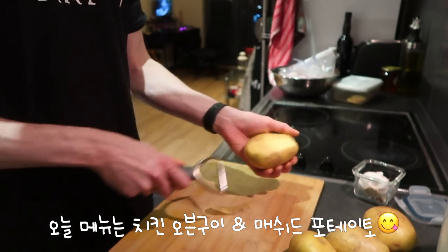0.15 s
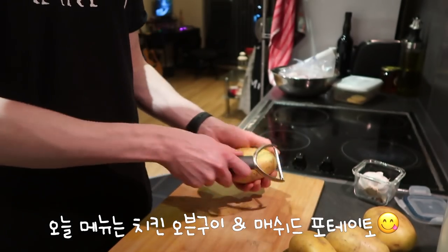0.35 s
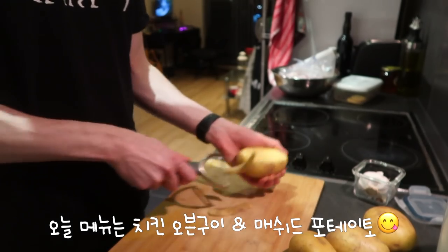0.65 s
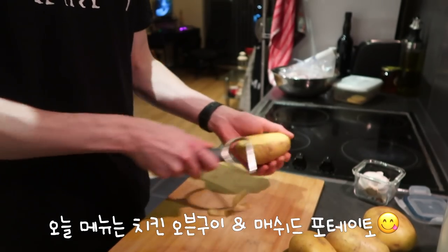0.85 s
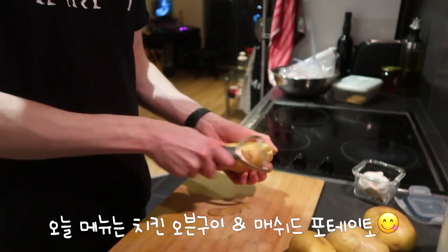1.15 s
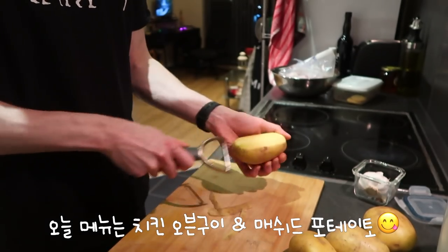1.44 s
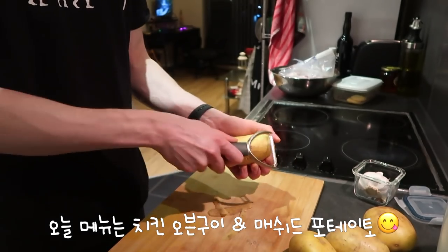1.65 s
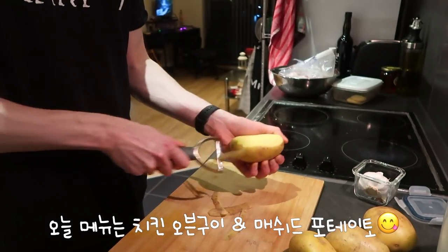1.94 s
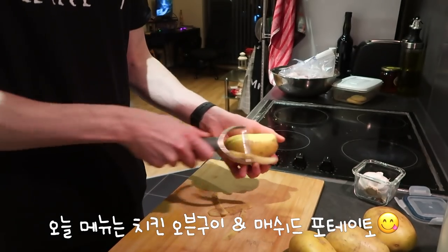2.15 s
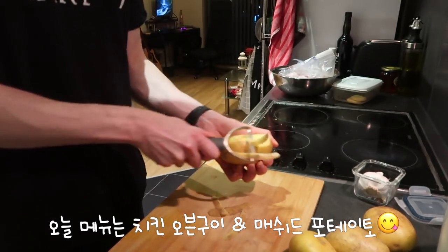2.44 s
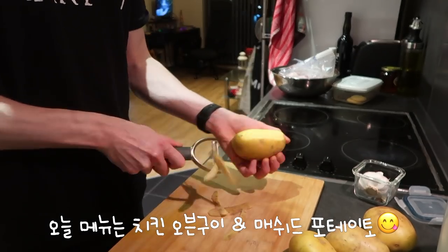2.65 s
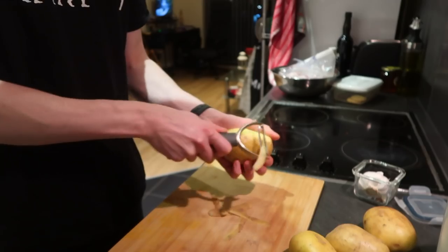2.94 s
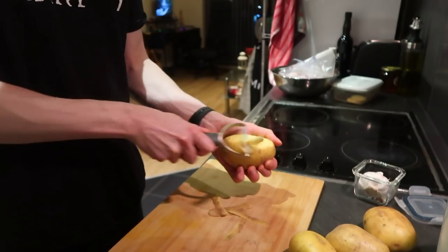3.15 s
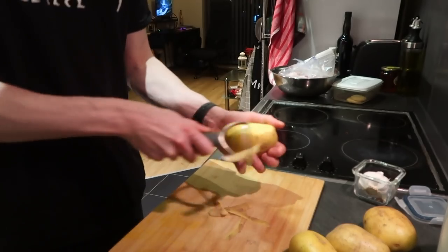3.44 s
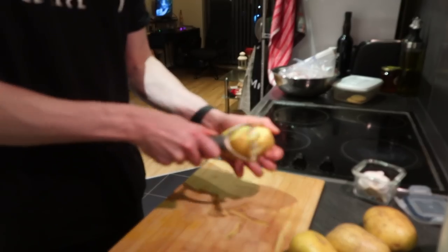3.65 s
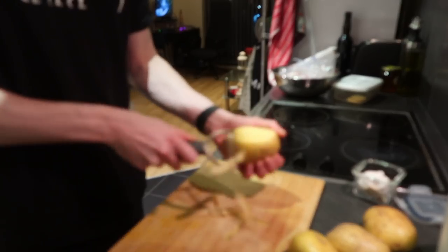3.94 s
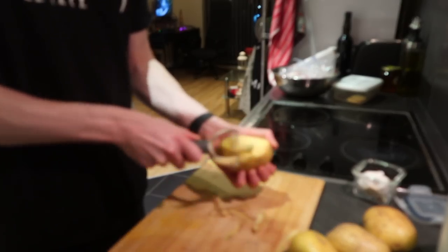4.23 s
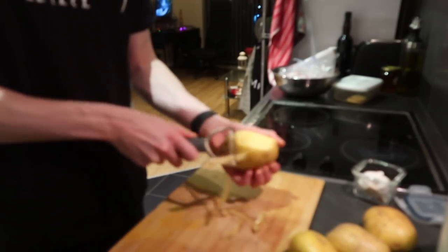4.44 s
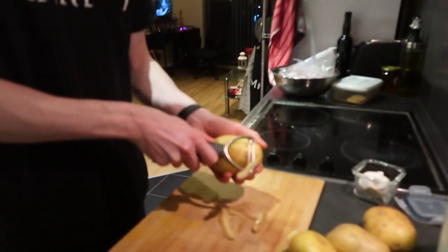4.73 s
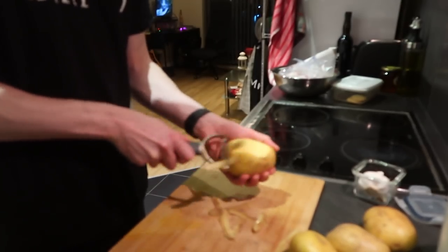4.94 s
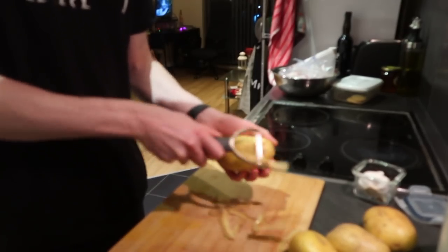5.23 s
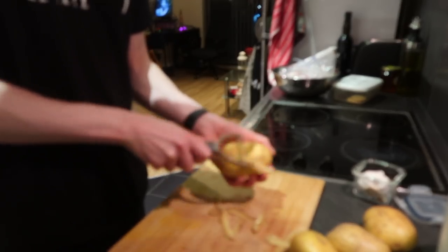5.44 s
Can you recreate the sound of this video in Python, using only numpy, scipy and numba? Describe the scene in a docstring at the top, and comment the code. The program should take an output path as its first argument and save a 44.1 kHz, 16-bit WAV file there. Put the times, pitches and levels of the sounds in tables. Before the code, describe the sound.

Ten short peeling strokes on a firm potato, heard from very near, with light rattles of the thin metal blade between them. The rasps are dry and crisp, rising in brightness toward their ends. Behind them an extractor rumbles steadily, and four muffled, ringing knocks sound elsewhere at uneven intervals. The room echo is short, and the recording level dips slightly after loud hits.

```python
"""A swivel peeler is drawn over a potato in ten quick strokes at a kitchen counter, above an extractor's rumble.
From the first stroke on, struck blade modes click and random tearing clicks rasp through sliding blade bands;
wavering noise bands squeak now and then. Four dull knocks of coloured, ringing noise sound from further off
and die away among the strokes. Two close microphone ports hear it all; a gain control turns loud moments down.
"""
import sys
import numpy as np
from scipy import signal
from scipy.fft import rfft, irfft
from scipy.io import wavfile
from scipy.ndimage import uniform_filter1d
from numba import njit

SR = 44100
rng = np.random.default_rng(int(sys.argv[2]) if len(sys.argv) > 2 else 0)


def digitize_waveform(pressure):
    """Quantize a signal to 16-bit integers and store it at the path in sys.argv[1].

    Rows of a 2-D input are taken as channels; values are limited to [-1, 1].
    """
    field = np.atleast_2d(pressure).T
    bounded = np.clip(field, -1, 1)
    quanta = np.round(bounded * 32767).astype(np.int16)
    wavfile.write(sys.argv[1], SR, quanta)


N = 246116
HZ = np.fft.rfftfreq(N, 1 / SR) + 1e-3
TIME = np.arange(N) / SR

# peeling strokes: start_s, first_glide_s, second_glide_s, start_db, second_db, end_db, treble_share_db, flesh_share_db,
# low_band_start_hz, low_band_end_hz, high_band_start_hz, high_band_end_hz, high_band_share_db
PEEL_STROKES = [(0.0, 0.0063, 0.0082, -33, -41, -32, -9.5, -11.5, 2600, 2800, 4060, 4320, -1),
                (0.509, 0.019, 0.16, -48, -39, -35.5, -14, -11, 2680, 2360, 4960, 5480, -7),
                (1.165, 0.14, 0.088, -46.5, -39.5, -46, -12, -15, 2650, 2290, 4440, 5500, -3),
                (1.776, 0.033, 0.19, -53, -38.5, -40, -14, -15.5, 2600, 2460, 4400, 5070, -11),
                (2.368, 0.0084, 0.25, -31.5, -52, -39, -12, -1, 2500, 2070, 4380, 5040, -20),
                (3.117, 0.025, 0.16, -68, -44.5, -39.5, -10, -5, 2670, 2250, 3950, 5300, -9.5),
                (3.689, 0.049, 0.088, -42, -37, -39.5, -12, -11.5, 2550, 2540, 4050, 4660, -1.5),
                (4.172, 0.049, 0.15, -52, -37, -41, -11.5, -14.5, 2700, 2320, 4470, 5330, -11),
                (4.872, 0.013, 0.13, -51, -40.5, -35, -13, -20.5, 2630, 2480, 4730, 5700, -10),
                (5.411, 0.015, 0.14, -60, -41.5, -34, -16, -26, 2880, 2480, 4830, 4700, -12)]
# blade landing and rattling on its pivots: start_s, level_db, brightness_db, skid_db, strongest_ring_hz, second_ring_hz
BLADE_CONTACTS = [(0.0044, -24, -8, -45, 2720, 2720), (0.084, -22, -1, -43, 3500, 2480),
                  (0.147, -27.5, -3, -50.5, 2470, 1450), (0.475, -4, -2, -35.5, 3030, 3050),
                  (0.4874, -21, 12, -52, 2920, 4750), (0.716, -17.5, -4.5, -46.5, 3260, 3260),
                  (0.801, -29, 0, -43.5, 3040, 2930), (1.0605, -22.5, -7, -59, 3300, 1700),
                  (1.0915, -17, -2, -41, 2860, 4330), (1.099, -22, -6, -51, 2350, 4640),
                  (1.108, -34, 0, -63, 1900, 4200), (1.304, -30.5, -15, -50, 2180, 2180),
                  (1.339, -32, -4, -43.5, 2320, 2310), (1.3985, -21.5, -3, -49, 2960, 2960),
                  (1.456, -26.5, -1, -49, 2290, 2290), (1.522, -32, -11, -60, 2430, 2430),
                  (1.737, -12, -0.5, -40, 3210, 2480), (1.745, -21.5, 5, -47.5, 3050, 2080),
                  (2.042, -26, -6, -46, 2920, 4750), (2.754, -41, 2, -46.5, 1910, 1900),
                  (2.79, -28, 4, -52, 2320, 2340), (2.8888, -22.5, -3, -45.5, 1900, 3640),
                  (2.897, -28, -7.5, -48.5, 1140, 1950), (3.071, -36, -17, -40, 3070, 3100),
                  (3.084, -11.5, -2.5, -43, 3520, 3500), (3.0903, -20.5, -7, -39, 3480, 4200),
                  (3.1, -22, -2, -41.5, 2900, 4200), (3.6228, -29, -3, -50, 3480, 3460),
                  (3.6336, -17.5, -0.5, -40, 2080, 2080), (3.6596, -15, -5, -38.5, 3000, 2500),
                  (4.096, -28.5, -13, -57, 2300, 2270), (4.1689, -9.5, 3, -40.5, 2080, 3920),
                  (4.179, -29, 6, -41.5, 4750, 5250), (4.803, -2, 0, -37, 2130, 3300),
                  (4.814, -16, 3, -42, 2100, 5250), (5.009, -34, -4, -44, 2350, 2350),
                  (5.02, -27, -2, -45, 2350, 2900), (5.074, -24.5, 2.5, -48, 2920, 3540),
                  (5.196, -37, 5, -61, 2340, 2340), (5.312, -50, 3, -49, 1990, 1990),
                  (5.358, -12, -2, -38, 2070, 2950), (5.368, -28, 5, -48, 4800, 2080)]


def amp(db):
    """dB to gain."""
    return 10 ** (np.asarray(db) / 20)


def rms_one(x):
    """Scale to unit power."""
    return x / np.sqrt(np.mean(x ** 2) + 1e-20)


def colour(x, points):
    """Shape by a spectrum drawn on log frequency, falling 30 dB per octave outside it."""
    hz, db = np.transpose(points)
    octaves = np.log2(HZ)
    below = np.maximum(np.log2(hz[0]) - octaves, 0)
    above = np.maximum(octaves - np.log2(hz[-1]), 0)
    gain_db = np.interp(octaves, np.log2(hz), db) - 30 * (below + above)
    return irfft(rfft(x) * amp(gain_db), N)


def butter_part(x, order, hz, kind):
    """Part of x below ("low") or above ("high") a corner."""
    return signal.sosfilt(signal.butter(order, hz, kind, fs=SR, output="sos"), x)


def resonate(x, hz, width_hz):
    """Two-pole resonance, gain 1 on top."""
    r = np.exp(-np.pi * width_hz / SR)
    poles = [1, -2 * r * np.cos(2 * np.pi * hz / SR), r * r]
    return signal.lfilter(np.array([1, 0, -1]) * (1 - r * r) / 2, poles, x)


def resonate_twice(x, hz, width_hz):
    """Two equal resonances in series: steeper skirts."""
    return resonate(resonate(x, hz, width_hz), hz, width_hz)


@njit
def glide(x, turn, r):
    """Two-pole resonance whose centre moves; turn is the cosine of its phase step."""
    y = np.zeros(x.size)
    for i in range(2, x.size):
        y[i] = (1 - r * r) / 2 * (x[i] - x[i - 2]) + 2 * r * turn[i] * y[i - 1] - r * r * y[i - 2]
    return y


def glide_twice(x, hz, width_hz):
    """Two equal moving resonances in series."""
    turn, r = np.cos(2 * np.pi * hz / SR), np.exp(-np.pi * width_hz / SR)
    return glide(glide(x, turn, r), turn, r)


def drift(rate_hz):
    """Slow random wander of spread 1: noise through two equal real poles."""
    r = np.exp(-2 * np.pi * rate_hz / SR)
    return rms_one(signal.lfilter([1], [1, -2 * r, r * r], rng.standard_normal(N + SR))[SR:])


def extractor():
    """Broad rumble with narrow motor and duct bands in the middle, faint wide hiss at the sides."""
    # rumble spectrum: hz, relative_db_per_hz
    rumble_spectrum = [(21, -8), (36, -3), (74, 4), (146, 2), (234, -12.5), (376, -9.5), (619, -24.5),
                       (719, -24), (1450, -27.5), (1900, -28), (4230, -32.5), (7890, -47), (8710, -48.5),
                       (10100, -50.5), (14000, -81)]
    # side hiss spectrum: hz, relative_db_per_hz
    hiss_spectrum = [(35, -47), (60, -50), (186, -4), (399, -0.5), (514, -7.5), (1670, -12), (2010, -13.5),
                     (4020, -14.5), (11400, -28.5), (13400, -30), (15000, -71)]
    # motor and duct bands: centre_hz, width_hz (of each of two passes), level_db
    motor_bands = [(151.35, 5.5, -44.5), (199.2, 20.3, -50), (271.6, 3.34, -52.5), (341, 5, -64.5),
                   (369, 26, -68), (1836, 270, -60.5)]
    rumble_db, hiss_db = -38, -55.5
    mid = amp(rumble_db + 1.23 * drift(4.1)) * rms_one(colour(rng.standard_normal(N), rumble_spectrum))
    for hz, width_hz, db in motor_bands:
        waver_db = 1.8 * drift(6)
        mid = mid + amp(db + waver_db) * rms_one(resonate_twice(rng.standard_normal(N), hz, width_hz))
    side = amp(hiss_db) * rms_one(colour(rng.standard_normal(N), hiss_spectrum))
    return mid + side * [[1], [-1]]


def knocks():
    """Heard by way of the walls: coloured noise with narrow resonances changes colour and dies; mid and side."""
    # far knocks: start_s, rise_s, hold_s, level_db, first_peak_db (above level), decay_db_per_s, bass_loss_db_per_s,
    # fading_hz, fading_loss_db_per_s, lasting_hz, lasting_gain_db_per_s, low_note_hz, low_note_db (re level),
    # high_note_hz, high_note_db (re level)
    far_knocks = [(0.579, 0.0052, 0.0065, -25, 8, 200, 22, 760, 60, 433, 2, 428.6, 3, 1098, -1.5),
                  (1.974, 0.0079, 0.023, -38, -2.5, 117, -7, 2600, 6, 670, 12, 679.5, -1.5, 880, -4),
                  (2.341, 0.0088, 0.072, -12.5, 4, 89.5, 27, 706, 3, 1740, 19.5, 298.2, -25, 1043, -10),
                  (4.58, 0.0098, 0.022, -27, -3.5, 95, 33, 2570, 90, 1230, 47, 1000, -5.5, 1360, -15)]
    # one spectrum per knock: hz, relative_db_per_hz
    knock_spectra = [
        [(120, -22), (200, -35.5), (437, -4), (572, -13.5), (834, -10), (1090, -16), (1220, -18), (1550, -12),
         (1800, -23), (1970, -17), (3200, -17), (5000, -43), (6500, -59), (11000, -120)],
        [(240, -38), (400, -6), (527, -18), (667, -5.5), (774, -6), (1440, -12), (2000, -16.5), (2600, -35),
         (4400, -120)],
        [(150, -17), (250, -22.5), (300, -25.5), (470, -16.5), (670, -13), (1020, -6.5), (1350, -11.5),
         (1750, -13.5), (2200, -15), (2700, -18), (3200, -25.5), (5000, -37.5), (9000, -58.5), (12000, -88)],
        [(400, -12), (620, -16), (740, -2.5), (860, -3.5), (1050, -2), (1370, -5), (1500, -7.5), (2150, -16),
         (2600, -18), (3100, -15), (3450, -8), (3800, -16), (6000, -21.5), (9500, -35), (13500, -65)],
    ]
    # narrow resonances shared by the knocks: centre_hz, width_hz, boost_db
    resonances = [(307, 15.7, 18.5), (405, 40, 3), (653, 42, 5), (727, 12, 4.5), (880, 22, 1.5),
                  (1100, 38, 4.5), (1004, 45, 1), (1190, 55, 4.5), (1350, 27, -1.5), (1360, 36, 8.5),
                  (1540, 15, 8), (1771, 35, 5), (1917, 34, 8), (2143, 24, 7.5), (3360, 26, 6)]
    peak_decay_s, rise_db = 0.016, 26.5
    ring_gain_db_per_s = 4  # the ringing outlasts the broad noise
    boom_lag_s, boom_lag_db = 0.021, 13  # the lowest part builds up late
    out, rough_db = np.zeros((2, N)), 1.0 * drift(80)
    for knock, spectrum in zip(far_knocks, knock_spectra):
        start, rise, hold, db, peak_db, decay, bass_loss, *bands_and_notes = knock
        fading_hz, fading_db, lasting_hz, lasting_db, *notes = bands_and_notes
        span = slice(round(start * SR), round(start * SR) + SR)
        since = TIME[span] - start
        age, after = np.maximum(since - rise, 0), np.maximum(since - rise - hold, 0)
        level_db = db + peak_db * np.exp(-age / peak_decay_s) - decay * after
        level_db -= rise_db * np.clip(1 - since / rise, 0, 1)

        noise = colour(rng.standard_normal((2, N)), spectrum)[:, span]
        rings = sum((amp(boost_db) - 1) * resonate(noise, hz, width_hz) for hz, width_hz, boost_db in resonances)
        late_ring = amp(np.minimum(ring_gain_db_per_s * age, 8)) - 1
        body = rms_one(noise + rings) + late_ring * rings / np.std(noise + rings)
        for hz, note_db in np.reshape(notes, (2, 2)):  # two decaying notes
            onset = 1 - np.exp(-since / 0.0094)
            body[0] += amp(note_db - 48 * age) * onset * np.sin(2 * np.pi * hz * since)
        fade = 1 - amp(-np.clip(fading_db * age, -6, 30))
        body = body - fade * resonate(body, fading_hz, 0.13 * fading_hz)
        growth = amp(np.clip(lasting_db * age, 0, 12)) - 1
        body = body + growth * resonate(body, lasting_hz, 0.28 * lasting_hz)

        bass_db = -np.clip(bass_loss * age, -12, 14)
        crack_db = 4.6 * np.exp(-age / 0.016) - 1.5  # early treble excess
        boom_db = -boom_lag_db * np.exp(-age / boom_lag_s)
        shaped = body + (amp(bass_db) - 1) * butter_part(body, 1, 1450, "low")
        shaped += (amp(crack_db) - 1) * butter_part(body, 1, 3000, "high")
        shaped += (amp(boom_db) - 1) * butter_part(body, 1, 330, "low")
        out[:, span] += amp(level_db + rough_db[span]) * shaped
    return out


def squeaks():
    """Skin rubs on steel and fingers: narrow noise bands that waver in pitch, flicker, swell and fade."""
    # wet squeaks and faint rubs: start_s, length_s, pitch_hz, width_hz (of each of two passes), level_db
    rubs = [(.14, 0.14, 970, 514, -53.5), (0.293, 0.077, 2180, 400, -56), (1.416, 0.086, 1540, 90, -49.5),
            (3.17, 0.093, 790, 90, -54), (3.248, 0.029, 1514, 69.6, -38), (3.394, 0.032, 1710, 70, -54),
            (3.9, 0.25, 2100, 150, -54), (3.88, 0.23, 1560, 170, -51)]
    out, wander, flicker = np.zeros(N), 1 + 0.02 * drift(6.4), amp(2.2 * drift(12.0))
    for start, length, hz, width_hz, db in rubs:
        span = slice(round(start * SR), round(start * SR) + SR // 2)
        swell = np.sin(np.pi * np.clip((TIME[span] - start) / length, 0, 1))
        band = glide_twice(rng.standard_normal(SR // 2), hz * wander[span], width_hz)
        out[span] += amp(db) * swell * rms_one(band)
    return out * flicker


def ticks():
    """Each contact is a few ms of chatter: a broad crunch, and the blade's modes struck with random strengths."""
    # struck blade modes: hz, level_db (before strike offsets), nominal_t60_s (before the cap and widening below)
    tick_modes = [(1140, -6.5, 0.018), (1450, -5, 0.023), (2080, -5.5, 0.013), (2350, -3, 0.021),
                  (3055, 1, 0.0095), (3530, -3.5, 0.015), (4200, -3, 0.012), (4750, -2.5, 0.013),
                  (5250, -12.5, 0.036)]
    # skin giving way: hz, relative_db_per_hz
    crunch_spectrum = [(900, -30), (1500, -46), (2100, 7), (3300, 1.5), (4900, 2.5), (6500, -9.5),
                       (9000, -5), (13000, -75), (15500, -52)]
    chatter_decay_s = 0.0024
    t60_cap_s = 0.014  # the potato damps the blade
    bright_db, *ring_hz = np.array(BLADE_CONTACTS)[:, [2, 4, 5]].T

    def chatter(offsets_db):
        """Noise bursts, one per contact."""
        drive = np.zeros(N)
        age = np.arange(1300) / SR
        shape = (1 - np.exp(-age / 0.0012)) * np.exp(-age / chatter_decay_s)
        for (start, level_db, *_), offset_db in zip(BLADE_CONTACTS, offsets_db):
            drive[round(start * SR):][:age.size] += amp(level_db + offset_db) * shape
        return drive * rng.standard_normal(N) + 1e-18

    strengths_db = rng.normal(0, 2.0, (len(BLADE_CONTACTS), len(tick_modes)))
    rings = 0
    for k, (hz, mode_db, t60) in enumerate(tick_modes):
        # where the blade is struck favours modes near its two ring pitches
        favour_db = 13.3 * np.exp(-(np.log2(hz / np.array(ring_hz)) / 0.064) ** 2).max(axis=0)
        tilt_db = bright_db * np.log2(hz / 3000)
        strike = chatter(mode_db + 3.0 + favour_db + strengths_db[:, k] + tilt_db)
        width_hz = np.log(1000) / (np.pi * min(t60, t60_cap_s))
        rings = rings + resonate_twice(strike, hz, 2.0 * width_hz)
    dull = colour(chatter(-7.5 - bright_db), crunch_spectrum)
    sharp = colour(chatter(-7.5 + bright_db), crunch_spectrum)
    return rings + butter_part(dull, 2, 3000, "low") + butter_part(sharp, 2, 3000, "high")


def strokes():
    """Blade, treble, flesh levels: a stroke glides from start to second to end level, stops fast, lingers; contacts skid."""
    # the cut stops fast, then a faint tail lingers and fades more slowly
    stop_db_per_s, linger_db, linger_db_per_s = 603, -16.5, 80
    linger_shares_db = np.c_[0, -2.5, 2].T  # blade, treble, flesh
    skid_db_per_s, skid_shares_db = 372, np.c_[0, -2.5, -3].T
    power = np.zeros((3, N)) + 1e-12
    for start, glide1, glide2, start_db, second_db, end_db, treble_db, flesh_db, *_ in PEEL_STROKES:
        after = np.maximum(TIME - start - glide1 - glide2, 0)
        corners_s = [start - .01, start, start + glide1, start + glide1 + glide2]
        cut_db = np.interp(TIME, corners_s, [-99, start_db, second_db, end_db])
        power += amp(2 * (cut_db - stop_db_per_s * after + np.c_[0, treble_db, flesh_db].T))
        slide_db = end_db + linger_db - linger_db_per_s * after + linger_shares_db
        power += amp(2 * slide_db) * (after > 0)
    age = np.arange(round(.2 * SR)) / SR
    skid = amp(2 * (skid_shares_db - skid_db_per_s * age)) * np.clip(age / 0.0065, 0, 1)
    for start, _, _, skid_db, *_ in BLADE_CONTACTS:
        i = round(start * SR)
        power[:, i:i + age.size] += amp(2 * skid_db) * skid[:, :N - i]
    return np.sqrt(power)


def blade_bands():
    """Two bands slide as the cut goes on, and wander: low Hz, high Hz, share of the high one in dB."""
    wander_share = 0.022
    late_rise_power = 2.7  # the high band moves mostly near the end of the cut
    start, glide1, glide2, *_, low, low_end, high, high_end, high_db = np.transpose(PEEL_STROKES)
    k = np.maximum(np.searchsorted(start, TIME, "right") - 1, 0)  # current stroke
    done = np.clip((TIME - start[k]) / (glide1 + glide2)[k], 0, 1)
    low_hz = (low[k] + (low_end - low)[k] * done) * (1 + wander_share * drift(4.1))
    high_hz = (high[k] + (high_end - high)[k] * done ** late_rise_power) * (1 + wander_share * drift(4.9))
    return low_hz, high_hz, high_db[k]


def rasp():
    """Cells tear under the edge: dense uneven clicks ring the frame and two blade bands that move with the cut."""
    # steady modes of the frame: hz, nominal_width_hz (widened 1.4 times below), relative_db
    frame_modes = [(1450, 490, -7), (2093, 356, 1.5), (2790, 750, -3.5), (3240, 370, -2.5),
                   (4470, 1230, -10), (4750, 300, -21)]
    # rasp treble: hz, relative_db_per_hz
    treble_spectrum = [(3000, 3), (4000, 3), (5500, 7), (8500, 0), (10000, -17), (13000, -10.5),
                       (15000, -34)]
    # potato and hand: hz, relative_db_per_hz
    flesh_spectrum = [(300, -5), (700, 6.5), (1300, 1.5), (1700, 2), (2400, 7)]
    tears_per_s, grains_per_s = 7000, 1500
    blade_level, treble_level, flesh_level = strokes()
    low_hz, high_hz, high_db = blade_bands()

    sizes = amp(1.8 * np.minimum(rng.exponential(1, N), 6)) * rng.choice([-1, 1], N)
    tears = rms_one(sizes * (rng.random(N) < tears_per_s / SR)) * amp(1.0 * drift(45))
    grain_sizes = amp(3.2 * np.minimum(rng.exponential(1, N), 6)) * np.sign(sizes)
    grains = rms_one(grain_sizes * (rng.random(N) < grains_per_s / SR))

    def catches():
        """Tears plus coarser grains, shifted anew for each band."""
        return .45 * tears + .9 * np.roll(grains, rng.integers(N))

    def swell_db():
        """Slow level wander of one band."""
        return 2.0 * drift(20)

    blade = np.zeros(N)
    for k, (hz, width_hz, db) in enumerate(frame_modes):
        blade += (-1) ** k * resonate_twice(catches(), hz, 1.4 * width_hz) * amp(db + swell_db())
    for hz, width_hz, db in ((low_hz, 280, 3), (high_hz, 380, high_db)):
        blade += glide_twice(catches(), hz, width_hz) * amp(db + swell_db())
    jerks = rms_one(amp(1.8 * drift(140)))  # the skin gives way unevenly
    treble = rms_one(colour(tears, treble_spectrum))
    flesh = rms_one(colour(tears, flesh_spectrum))
    return jerks * (blade_level * rms_one(blade) + treble_level * treble + flesh_level * flesh)


def kitchen(x):
    """Direct sound and diffuse echo; the side axis hears it smeared by near surfaces and with its own echo."""
    t60_s, echo_db = 0.34, -8.5
    age = np.arange(round(.7 * SR)) / SR
    echo = rng.standard_normal((2, age.size)) * amp(-60 * age / t60_s) * np.clip(age / 0.00098 - 1, 0, 1)
    echo = echo / np.sqrt(np.sum(echo ** 2, axis=1, keepdims=True))
    echo = signal.lfilter([1], [1, -.4], echo) * amp(echo_db)
    smear = 1.0 * (age == 0)
    for lag in (5, 11, 19, 31, 47):  # samples
        poles = np.r_[1, np.zeros(lag - 1), -.55]
        smear = signal.lfilter(poles[::-1], poles, smear)  # all-pass: timing blurs, colour stays
    echo[0, 0] += 1
    echo[1] += smear
    return signal.fftconvolve(x[None], echo, axes=1)[:, :N]


def ports(mid, side):
    """Close ports: the difference is faint in the bass and grows towards the treble."""
    # gain on the side signal: hz, gain_db
    side_gain = [(60, -48), (200, -31), (380, -25), (1290, -17), (2380, -17.5), (4400, -4.5), (6500, 2),
                 (8120, 4), (10000, 18.5), (12000, 17.5), (15000, -3)]
    return mid + colour(side, side_gain) * [[1], [-1]]


def scene():
    """Peeler near by, knocks and extractor around it."""
    peeler = kitchen(rasp() + ticks() + squeaks())
    mid, side = peeler + knocks()
    return ports(mid, side) + extractor()


def record(dry):
    """Gain control acts a little late above a threshold and lets go slowly; peaks are rounded, treble is cut."""
    threshold_db, slope, release_db_per_s, lag_s = -17.0, 0.68, 8.6, .05
    peak_limit, stopband_hz = .85, 15900
    level_db = 10 * np.log10(uniform_filter1d(np.mean(dry ** 2, axis=0), size=1300) + 1e-12)
    over_db = slope * np.maximum(level_db - threshold_db, 0)
    release_db = release_db_per_s * TIME
    held_db = np.maximum.accumulate(over_db + release_db) - release_db
    r = np.exp(-1 / (lag_s * SR))
    gain = amp(-signal.lfilter([(1 - r) ** 2], [1, -2 * r, r * r], held_db))
    rounded = peak_limit * np.tanh(dry * gain / peak_limit)
    return signal.sosfilt(signal.cheby2(12, 70, stopband_hz, fs=SR, output="sos"), rounded)


dry = scene()
out = record(dry)
digitize_waveform(out)
```